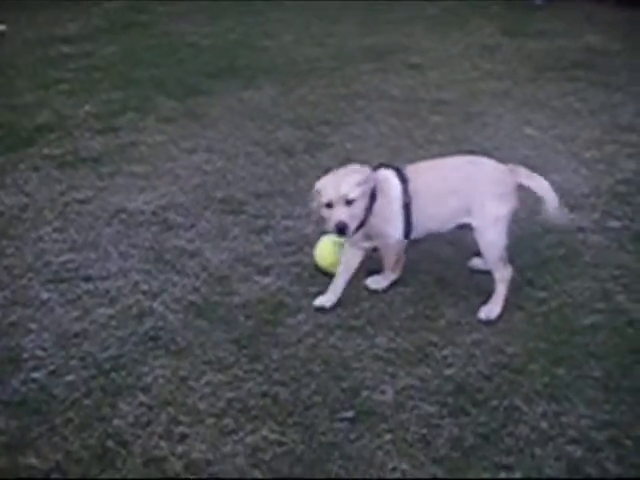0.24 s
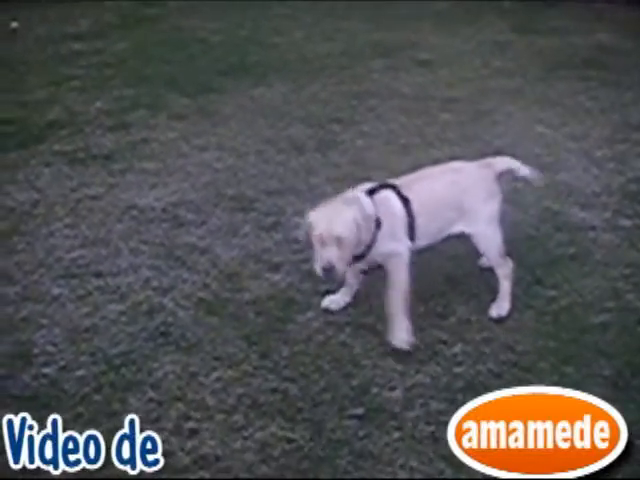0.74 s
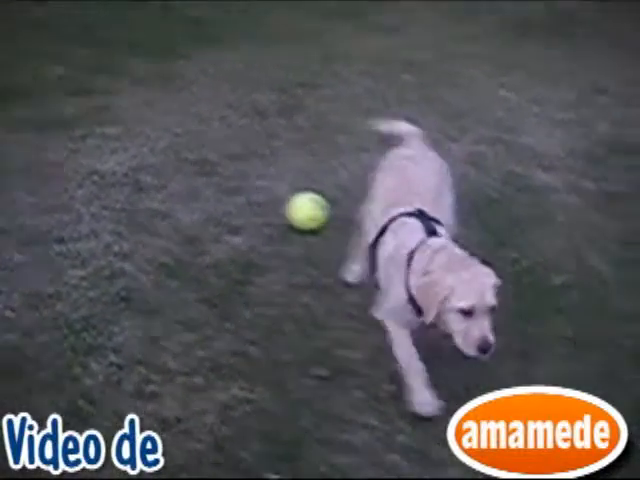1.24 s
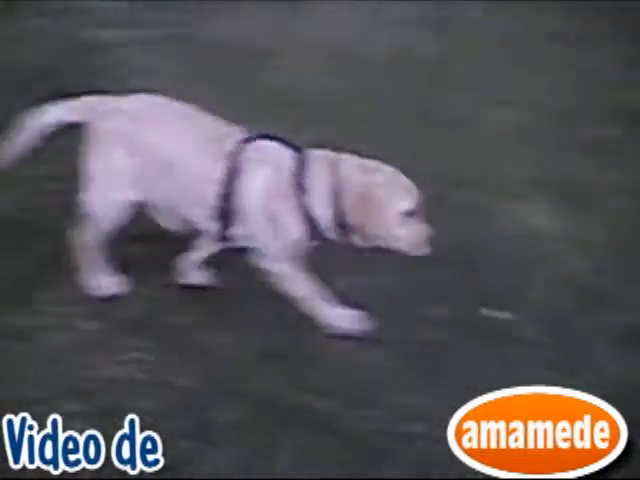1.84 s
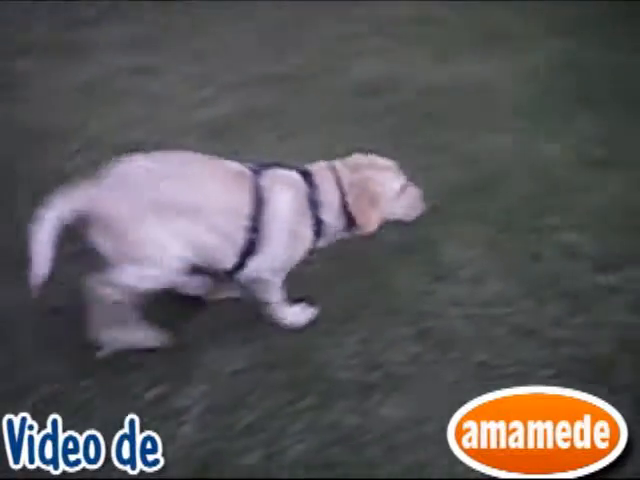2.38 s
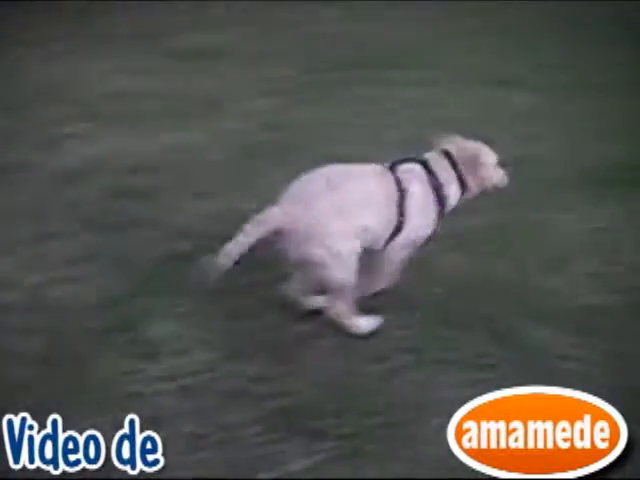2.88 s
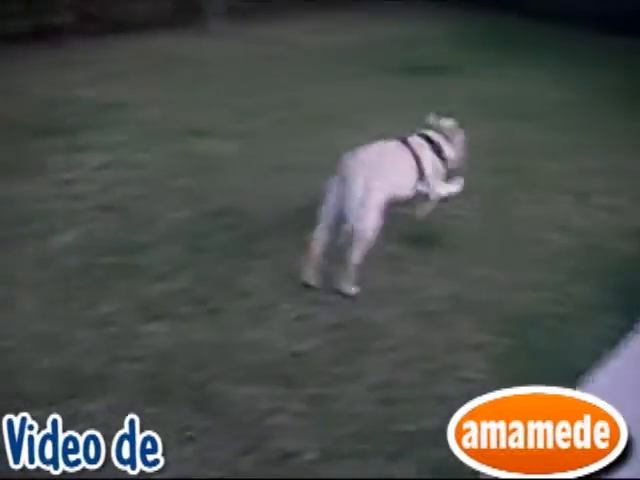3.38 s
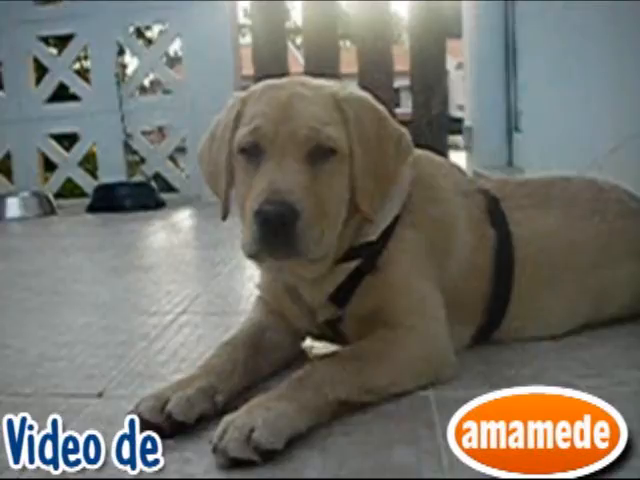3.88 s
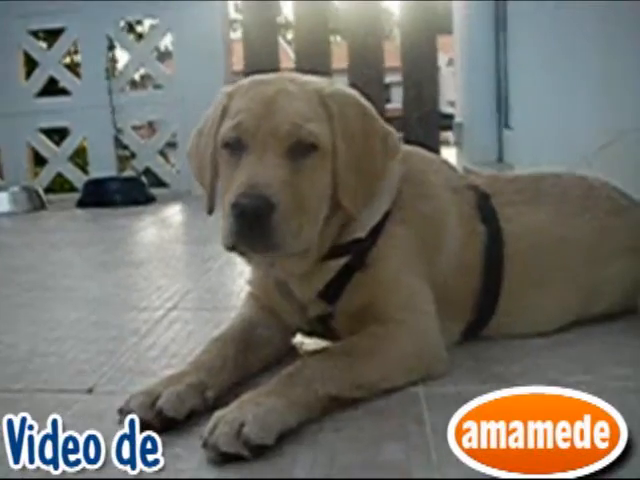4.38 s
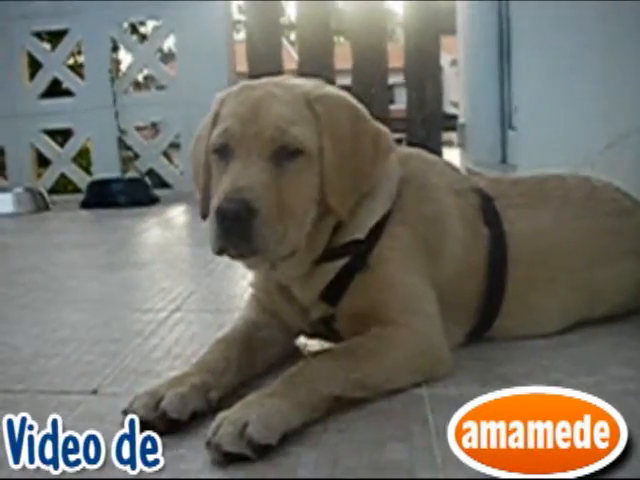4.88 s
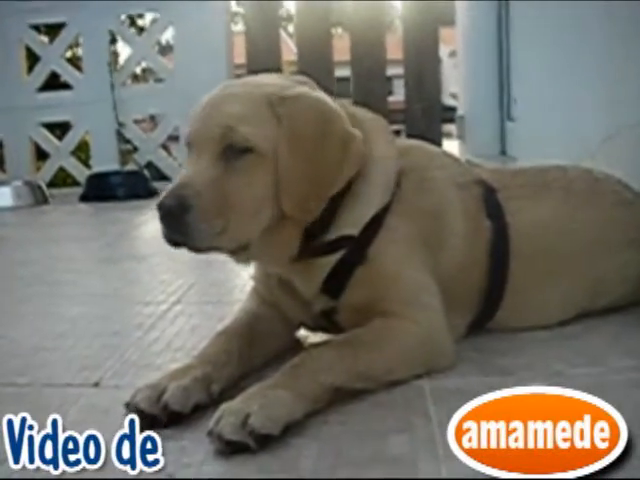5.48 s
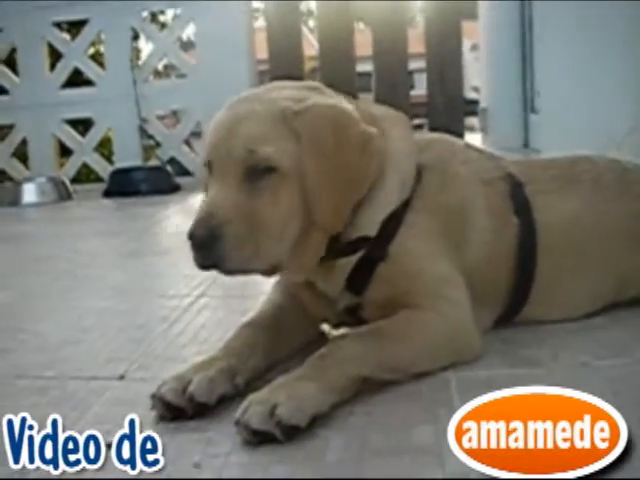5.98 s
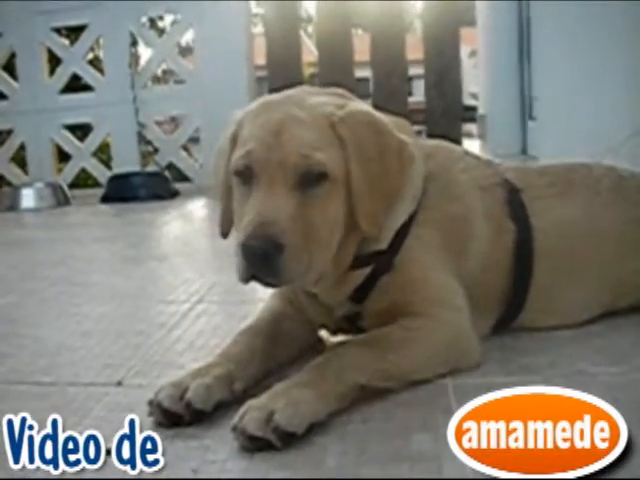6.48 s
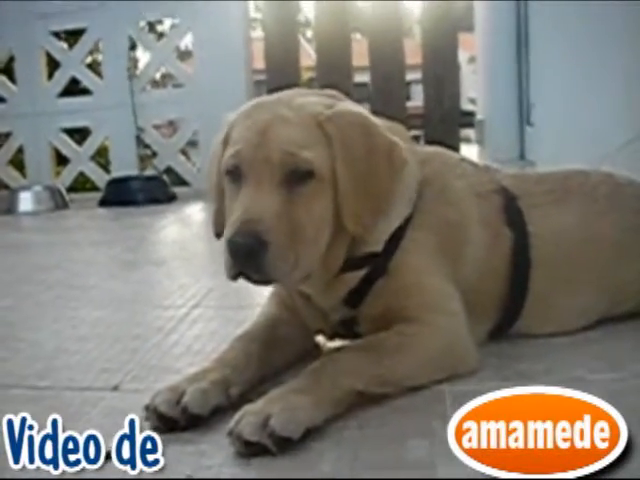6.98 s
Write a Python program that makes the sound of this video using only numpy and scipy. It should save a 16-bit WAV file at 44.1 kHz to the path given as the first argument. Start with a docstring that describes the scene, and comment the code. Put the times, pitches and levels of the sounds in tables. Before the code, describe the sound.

A songbird sings nearby in the open air, its notes trailed by a slight leafy echo. A quick rattle and repeated piping notes come first, then a gap with a soft knock and far-off birds. The singer returns with thin whistles, short chirps and a fast string of falling notes, while several dull taps sound close to the microphone. Steady hiss runs underneath, with spells of faint low rumble.

```python
"""A nightingale close by

It sings a dry rattle, piping notes, a pause, thin whistles, then fast repeated slurs. Each syllable is
one to three sliding tones from the two sides of its voice organ, the syrinx, loudest at the pitches
its throat passes best. Ground and leaves throw them back. Other birds repeat their notes far off over
a steady outdoor hiss and spells of low rumble. A few dull taps, knocks and bumps land nearby."""
import sys
import numpy as np
from scipy import signal
from scipy.fft import rfft, irfft
from scipy.io import wavfile
from scipy.ndimage import uniform_filter1d

SR = 44100
rng = np.random.default_rng(int(sys.argv[2]) if len(sys.argv) > 2 else 0)


def transcribe(u):
    """Save the signal u as a 16-bit wav file named by the first command-line argument.

    u: samples, shape (n,) or (channels, n), limited to [-1, 1]; the rate is SR.
    q: integer samples, one column per channel.
    """
    v = np.clip(np.atleast_2d(u).T, -1, 1)
    q = np.round(v * 32767).astype(np.int16)
    wavfile.write(sys.argv[1], SR, q)


N = 318843

# Freely timed notes, by syllable: t/s, level/dB, pitch factor, length factor (1 if left out)
SONG = { "tick": [(.4515, -11.5, 0.93, .94)], "pipe": [(.555, -9, .96, 0.83), (.686, -8.5, 0.97, .7),
        (.804, -7, 0.99, 0.97), (.940, -7, .98, 0.87), (1.071, -6.5, .98, 0.86), (1.212, -6.5, 0.99, .94),
        (1.3495, -6.5, 0.97, 1.12)], "dip": [(1.4665, -16), (1.55, -19, 1.22, 1.18)],
        "wheet": [(1.487, -9, 1.02, 1.03), (1.575, -10.5, 1.04, 0.69)], "chip": [(1.678, -27, 0.96, 0.71),
        (4.222, -32.5, .88, 1.9), (4.569, -29, 0.93, 0.83), (4.777, -29.5, 0.75, 2.4)],
        "seep": [(4.350, -24)], "twin": [(5.140, -25.5)], "swoop": [(5.570, -11)],
        "seesaw": [(5.854, -9, .98, 1.05), (5.948, -11.5, 1.018, 1.08), (6.041, -9, .97, 1.02),
        (6.144, -7, 1, .94)], "pip": [(6.246, -19.5, 1.025, 1.1), (6.264, -13, 0.95, 1.42),
        (6.299, -13, 1.016, .94), (6.331, -15.5, 1.02, 0.73)], "slur": [(6.4425, -7.5), (6.581, -8.5),
        (6.726, -7), (6.877, -7.5), (7.017, -7.5), (7.154, -8)], }
# Runs of one note: syllable, count, start t/s, gap/s, share the gap grows by per note,
# first level/dB, last level/dB, first pitch factor, last pitch factor, length factor
TRILLS = [("tick", 7, .026, .0588, .0075, -14, -12.5, 1.01, 1.01, 0.98),
          ("pip", 4, 4.958, 0.013, 0, -36.5, -34.5, 1.08, 1.2, 0.5),
          ("chup", 3, 5.313, .0855, 0, -19.5, -19, 0.96, 0.94, 0.96),
          ("chip", 5, 5.735, 0.012, 0, -33, -32.5, .55, 0.64, 0.89)]
def nightingale():
    """The near bird and its echoes, in stereo; the trills get an extra hissy wash around each note."""
    trilled = sing(trills(TRILLS))
    song = sing(singles(SONG)) + trilled
    leaf_echoes = wash(song, fade_s=.071, level_db=-8) + wash(song, fade_s=1, level_db=-23.5)
    trill_wash = wash(trilled, fade_s=.39, level_db=-14)
    return stereo(echoes(song) + leaf_echoes + trill_wash)


# The tones of each syllable: delay/ms, length/ms, level/dB, rise/ms, fall/ms, evenly timed list of f/Hz
SYLLABLES = { "tick": [(3.5, 12, 3, 9.2, 3, [2180, 3894, 5580, 6540]),
             (7, 11, -13, 3.6, 1.3, [2300, 4100, 5500]),
             (-0.5, 19, -3.5, 9.6, 3, [3590, 4523, 6990, 8300])],
             "pipe": [(-25.5, 19, 0, 2, 5, [2080, 1705, 1540, 1400]),
             (-24.5, 17, -30.5, 1.2, 7.9, [3900, 2700, 2300]),
             (-1, 53, 0, 5, 8, [2400, 2760, 2700, 2250, 1800, 1600, 1480])],
             "dip": [(0, 31, -1, 6, 2.9, [6040, 3894, 3684, 3805, 4700, 7360]),
             (0, 6.1, -3.5, 1.5, 1.3, [4220, 3020, 2000]), (5, 16, 0, 3, 2, [3400, 3250, 3500])],
             "wheet": [(0, 33, 0.5, 10, 20, [2196, 3736, 4480, 4674, 4650])],
             "chip": [(0, 6, 0, 3.8, 0.97, [2000, 3350, 4500])],
             "seep": [(0, 89, -10.5, 71, 10, [6900, 5660, 5160, 4980]),
             (73.3, 45, 6, 20, 4, [5000, 4890, 4950]), (118, 7.1, -6, 1.5, 5, [5100, 5700])],
             "twin": [(0, 54, 2, 28, 18, [4950, 4800, 4700]), (44, 44, -5, 10, 6, [4690, 4650, 4820]),
             (0, 88, 0, 35, 45, [6060, 6130, 6040, 6080])],
             "chup": [(0, 11, -7.5, 4.1, 5, [2100, 2980, 3900]),
             (3, 27.5, -1, 15, 11, [2000, 2400, 2420, 2240])],
             "swoop": [(0, 37, -15.5, 12, 4, [4850, 4740, 4400]),
             (0, 24, -11.5, 10, 7.1, [6350, 6160, 6600]),
             (23.6, 51.7, 0, 8.7, 16, [4595, 3890, 3304, 2997, 2800])],
             "seesaw": [(-1.5, 26.5, -1, 9.2, 3, [2620, 2793, 3153, 3656, 4180]),
             (34, 19, -7.5, 5.2, 5.6, [7080, 5490, 4760, 3840])],
             "pip": [(0, 22, 3, 2.1, 1.4, [2200, 2206, 2004, 1680])],
             "slur": [(0, 13, -2, 3, 6.9, [8090, 6110, 4200, 3340]),
             (0, 26, -5.5, 1, 3.6, [12700, 6500, 4730, 4263, 3720]),
             (24.5, 30.3, -0.5, 9.4, 2.2, [2860, 2920, 2702, 2100, 1510])],
             "twee": [(0.0098, 89, 1, 37, 10, [2780, 3150, 4700])],
             "tsee": [(0.005, 85, 2, 20, 15, [4800, 5450, 5750])],
             "tsiu": [(0, 64, 4, 10, 22, [5700, 4100, 9600])],
             "arch": [(0, 92, 0, 18, 20, [2290, 2470, 2480, 2320])], }
# How harsh a syllable is: its random pitch flutter, as a share of the pitch
ROUGHNESS = {"tick": 0.056, "chip": 0.091, "dip": 0.044, "seesaw": .017, "tsee": .025, "tsiu": 0.019,
             "arch": .009, "slur": .012, "seep": .002, "twin": .003}
def sing(notes, clear_flutter=.0073, vary_db=.78):
    """Builds each note from its syllable's tones, at its own time, level, pitch and length."""
    out = np.zeros(N)
    for name, start, db, pitch, length in notes:
        flutter = ROUGHNESS.get(name, clear_flutter)
        for delay_ms, length_ms, tone_db, rise_ms, fall_ms, pitches in SYLLABLES[name]:
            timing_s = length * np.array([length_ms, rise_ms, fall_ms]) / 1000
            gain = amp(db + tone_db + vary_db * rng.standard_normal())
            tone = syrinx_tone(*timing_s, pitch * np.array(pitches), flutter)
            add(out, start + delay_ms / 1000, gain * tone)
    return out


# Throat and beak pass the middle pitches best: f/Hz, level/dB
THROAT = [(1400, -31), (1650, -24.5), (1900, -16.5), (2100, -4), (2400, 0), (2850, -1.5), (3300, -3.5),
          (4100, -1), (4800, -3), (6200, -11.5), (8200, -26.5), (12500, -32)]
def syrinx_tone(length_s, rise_s, fall_s, pitches, flutter):
    """Air through one side of the syrinx makes a nearly pure, sliding tone; flutter makes it harsh."""
    t = np.arange(0, length_s, 1 / SR)
    glide = np.polyfit(np.linspace(0, 1, len(pitches)), np.log(pitches), len(pitches) - 1)
    hz = np.exp(np.polyval(glide, t / length_s))  # a smooth curve through the pitches
    wobble = evened(uniform_filter1d(rng.standard_normal(SR // 4), size=40))[:len(t)]
    phase = 2 * np.pi * np.cumsum(hz * (1 + flutter * wobble)) / SR
    ramp = np.clip(np.minimum(t / rise_s, (length_s - t) / fall_s), 0, 1)
    airflow = np.sin(np.pi / 2 * ramp) ** 2
    overtones = sum(amp(db) * np.sin(k * phase) * (k * hz < SR / 2) for k, db in [(2, -46), (3, -48)])
    return airflow * amp(read(THROAT, hz)) * (np.sin(phase) + overtones)


def singles(table):
    """Lists notes that are timed one by one, filling in missing factors with 1."""
    return [(name, *row, 1, 1)[:5] for name, rows in table.items() for row in rows]


def trills(table):
    """Lists repeated notes: the pace holds or slows while level and pitch slide from first to last."""
    notes = []
    for name, count, start, gap, slowing, first_db, last_db, first_pitch, last_pitch, length in table:
        for k, progress in enumerate(np.linspace(0, 1, round(count))):
            when = start + gap * k * (1 + slowing * (k - 1) / 2)
            db = first_db + progress * (last_db - first_db)
            pitch = first_pitch + progress * (last_pitch - first_pitch)
            notes.append((name, when, db, pitch, length))
    return notes


# Echoes off the ground and branches: delay/s, level/dB
ECHOES = [(.0034, -27), (.0068, -29.5), (0.0109, -31), (0.019, -33), (.0235, -37)]
def echoes(x):
    """Adds a few quick echoes, which make the sliding tones beat against themselves."""
    out = x.copy()
    for delay, db in ECHOES:
        add(out, delay, amp(db) * x)
    return out


# The tone colour of the wash, strongest at high pitches: f/Hz, level/dB
WASH_COLOUR = [(1200, -0.5), (2400, -3), (4500, -0.5), (7000, 6), (12000, 9.5)]
def wash(x, fade_s, level_db):
    """A hissy blur that trails each sound and drops 60 dB in fade_s."""
    t = np.arange(SR) / SR
    tail = rng.standard_normal(SR) * amp(-60 * t / fade_s) * np.clip(t / .00082, 0, 1)
    tail = coloured(tail / np.linalg.norm(tail), WASH_COLOUR)
    return amp(level_db) * signal.fftconvolve(x, tail)[:N]


# A slight level gap between the channels: f/Hz, left minus right level/dB
CHANNEL_GAP = [(1300, 0), (2000, -1.1), (3800, -1.1), (4200, 0), (12000, 0)]
def stereo(x):
    """The song's middle pitches sound slightly louder in the right channel."""
    gap_db = read(CHANNEL_GAP, np.fft.rfftfreq(N, 1 / SR))
    return np.array([irfft(rfft(x) * amp(side * gap_db), N) for side in (.5, -.5)])


# Single distant calls: columns as in SONG
FAR_SONG = {"arch": [(.085, -41.5, .97, .54), (6.52, -42, .95, 1.54)], "twee": [(2.085, -48)],
            "tsee": [(2.003, -48.5, 0.94, .85), (6.375, -46, 0.97, 0.71)]}
# Distant birds repeating one syllable: columns as in TRILLS
FAR_TRILLS = [("arch", 6, 2.17, .163, 0, -60, -58, 2.24, 2.27, .95),
              ("tsee", 7, 2.29, .163, 0, -59, -57.5, .79, .81, .75),
              ("arch", 9, 3.025, .1925, 0, -48, -41.5, 1.05, .98, .96),
              ("tsiu", 8, 3.655, .059, 0, -58, -61, 1.04, 1.02, .42),
              ("arch", 6, 4.812, .245, 0, -43, -43.5, 1.01, .97, 1.0)]
def far_birds(vary_s=.0037, vary_db=2.5, vary_pitch=.008, vary_length=.08):
    """Distant calls with a long echo from the leaves; no two repeats are quite alike."""
    notes = singles(FAR_SONG)
    for name, start, db, pitch, length in trills(FAR_TRILLS):
        late, louder, higher, longer = rng.normal(0, [vary_s, vary_db, vary_pitch, vary_length])
        notes.append((name, start + late, db + louder, pitch * (1 + higher), length * np.exp(longer)))
    calls = sing(notes)
    return calls + wash(calls, fade_s=1, level_db=-5.5)


# Dull taps near the microphone: t/s, level/dB
TAPS = [(2.7251, -24.5), (5.083, -9.5), (5.539, -8.5), (5.624, -22), (5.7265, -14.5), (5.7831, -13.5),
        (5.8893, -13.5), (5.991, -13), (6.1128, -17)]
# The tone colour of a tap: f/Hz, level/dB
TAP_COLOUR = [(59, -30.5), (100, -11), (195, -8.5), (401, -1.5), (881, -1), (2070, -6), (2730, -16),
              (2970, -26), (3290, -18), (4720, -34.5), (6000, -76), (7800, -101), (13200, -120)]
def taps(ring_hz=890, ring_fade_s=.066, ring_db=-21, size=2048):
    """Each tap is one short pulse with a faint ring."""
    colour_db = np.maximum(read(TAP_COLOUR, abs(np.fft.fftfreq(size, 1 / SR))), -70)
    # Minimum phase: packs the sound into the start of the pulse, like a real hit.
    spectrum = np.exp(signal.hilbert(np.log(amp(colour_db))).conj())
    pulse = np.fft.ifft(spectrum).real
    t = np.arange(size) / SR
    ring = amp(ring_db - 60 * t / ring_fade_s) * np.sin(2 * np.pi * ring_hz * t)
    tap = pulse / abs(pulse).max() + ring
    out = np.zeros(N)
    for start, db in TAPS:
        add(out, start, amp(db) * tap)
    return out


# Soft knocks: t/s, peak level/dB
KNOCKS = [(2.143, -21), (2.7237, -29.5)]
# The woody tones in a knock: f/Hz, level/dB, time to drop 60 dB/s
KNOCK_TONES = [(520, -6, .016), (720, -1, .016), (930, 0, .018), (1200, -3, .012), (1850, -6, .009)]
def knocks(contact_s=.002, cutoff_hz=3200):
    """A soft, scuffing contact sets a few woody tones ringing."""
    t = np.arange(SR // 10) / SR
    ring = sum(amp(db - 60 * t / fade_s) * np.sin(2 * np.pi * hz * t) for hz, db, fade_s in KNOCK_TONES)
    soften = signal.butter(2, cutoff_hz, fs=SR, output="sos")
    out = np.zeros(N)
    for start, db in KNOCKS:
        scuff = rng.standard_normal(len(t)) * np.exp(-t / contact_s)
        knock = signal.sosfilt(soften, signal.fftconvolve(ring, scuff))
        add(out, start, amp(db) * knock / abs(knock).max())
    return out


# Soft low bumps: t/s, peak level/dB
BUMPS = [(1.483, -27), (3.851, -28), (5.579, -26.5), (5.622, -26), (6.752, -33)]
def bumps(push_s=.0013):
    """Each bump is a low push with no ring."""
    age = np.arange(SR // 20) / SR / push_s
    push = uniform_filter1d((1 - age) * np.exp(-age), size=40, mode="constant", origin=19)
    out = np.zeros(N)
    for start, db in BUMPS:
        add(out, start, amp(db) * push / push.max())
    return out


def chorus(level_db=-58, count=56):
    """Small birds at the edge of hearing: thin random chirps, of which only the echoes arrive."""
    notes = []
    for k, (late, high, slow, kind) in enumerate(rng.random((count, 4))):
        name = "tsee" if kind < .5 else "tsiu"
        start = (k + late) * N / SR / count
        notes.append((name, start, level_db, .7 + .25 * high, .35 + .5 * slow))
    return wash(sing(notes), fade_s=.2, level_db=0)


# The loudness of the rustle: t/s, level/dB
RUSTLE = [(.37, -53), (.41, -37.5), (.48, -39), (.52, -53)]
def rustle():
    """Faint mid-pitched noise that swells once into a brief, soft rustle."""
    return band_noise(660, 1390, RUSTLE)


# Spells of low rumble: start t/s, end t/s, level/dB
RUMBLE = [(.24, .35, -54.5), (0.497, 1.7, -53), (2.052, 2.24, -57), (2.67, 2.79, -57.5),
          (5.027, 5.14, -51.5), (5.5, 7.23, -51.5)]
def rumble(floor_db=-75, fade_s=.037):
    """Deep noise that rises for each spell, holds, and sinks back."""
    curve = []
    for start, end, db in RUMBLE:
        curve += [(start - fade_s, floor_db), (start, db), (end, db), (end + fade_s, floor_db)]
    return band_noise(9.9, 80, curve)


# The tone colour of the outdoor hiss: f/Hz, level/dB
HISS_COLOUR = [(35, -52), (60, -29.5), (108, -3), (178, -2.5), (209, -0.5), (422, 0), (506, 0.5),
               (872, -5.5), (2260, -8), (2530, -6), (3110, -11), (4680, -17), (6000, -30), (11600, -46.5),
               (13600, -61.5)]
def hiss(level_db=-45.5, patchy_db=1.5):
    """Steady outdoor hiss with faint, drifting louder and softer patches."""
    hz, _, spectra = signal.stft(rng.standard_normal(N), SR, nperseg=1024)
    patches = uniform_filter1d(rng.standard_normal(spectra.shape), size=14, axis=0)  # blur over pitch
    patches = evened(uniform_filter1d(patches, size=7, axis=1))  # blur over time
    spectra *= amp(read(HISS_COLOUR, hz)[:, None] + patchy_db * patches)
    return amp(level_db) * evened(signal.istft(spectra, SR, nperseg=1024)[1][:N])


# How wide the hiss sounds: f/Hz, level/dB of the side hiss against the middle one
HISS_WIDTH = [(60, -52.5), (110, -54.5), (200, -48.5), (360, -33.5), (660, -36), (1200, -45), (2180, -0.5),
              (3960, 0), (7220, -17.5), (13100, -11.5)]
def wide_hiss():
    """A second hiss, added on the left and subtracted on the right, spreads the sound out."""
    middle, side = hiss(), coloured(hiss(), HISS_WIDTH)
    return np.array([middle + side, middle - side])


def band_noise(low_hz, high_hz, curve):
    """Noise between two pitches that follows a curve of (t/s, level/dB) points."""
    band = signal.butter(3, [low_hz, high_hz], btype="band", fs=SR, output="sos")
    level_db = np.interp(np.arange(N) / SR, *np.transpose(curve))
    return evened(signal.sosfilt(band, rng.standard_normal(N))) * amp(level_db)


def amp(db):
    """Turns decibels into a gain."""
    return 10 ** (np.asarray(db) / 20)


def evened(x):
    """Scales x to an average power of 1."""
    return x / np.sqrt(np.mean(x ** 2) + 1e-20)


def add(mix, start_s, sound):
    """Mixes a sound in at a given time."""
    part = mix[max(round(start_s * SR), 0):][:len(sound)]
    part += sound[:len(part)]


def read(points, hz):
    """The level at hz, on straight lines between (f/Hz, level/dB) points over log frequency."""
    f, db = np.transpose(points)
    return np.interp(np.log(hz + 1), np.log(f + 1), db)


def coloured(x, points):
    """Filters x by a curve of (f/Hz, level/dB) points."""
    return irfft(rfft(x) * amp(read(points, np.fft.rfftfreq(len(x), 1 / SR))), len(x))


def scene():
    """Birds and small contacts sit near the centre, over a slightly wide hiss."""
    birds = nightingale() + far_birds() + chorus()
    background = wide_hiss() + rumble() + rustle()
    return birds + background + taps() + knocks() + bumps()


# The microphone's uneven treble: f/Hz, level/dB
MICROPHONE = [(20, -3), (7000, 0), (8600, 1), (9600, -6.5), (11000, 2), (12200, 10.5), (13000, 2.5)]
def record(dry, ceiling_db=-6, cutoff_hz=12900, offset=-.0477):
    """The microphone colours the sound; the recorder tames peaks, cuts top treble and adds an offset."""
    heard = np.array([coloured(channel, MICROPHONE) for channel in dry])
    power = uniform_filter1d((heard ** 2).mean(0), size=60)
    peak = np.sqrt(2 * abs(power))
    limited = heard / uniform_filter1d(np.maximum(peak / amp(ceiling_db), 1), size=60)
    treble_cut = signal.firwin(255, cutoff_hz, window=("kaiser", 9), fs=SR)
    return signal.oaconvolve(limited, treble_cut[None], "same") + offset


dry = scene()
out = record(dry)
transcribe(out)
```